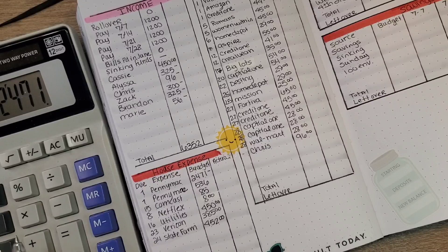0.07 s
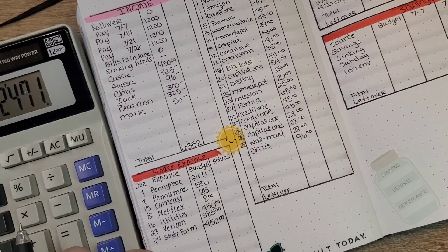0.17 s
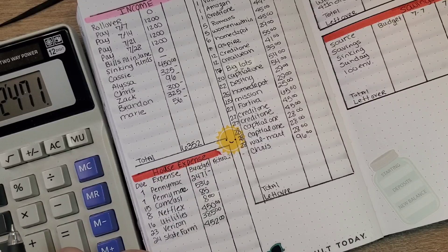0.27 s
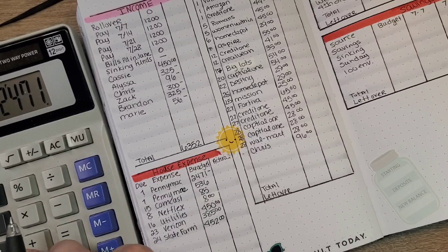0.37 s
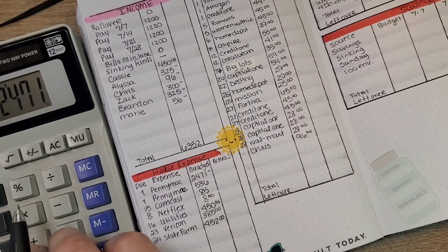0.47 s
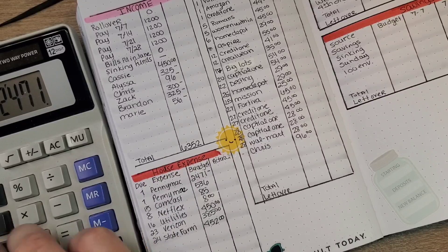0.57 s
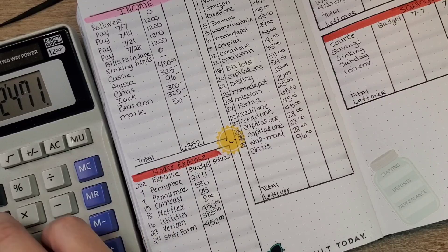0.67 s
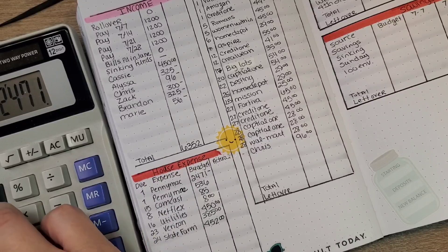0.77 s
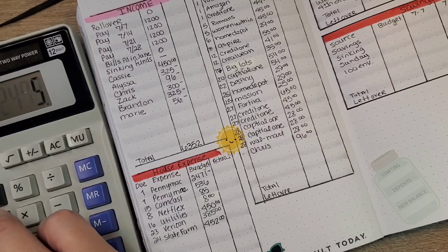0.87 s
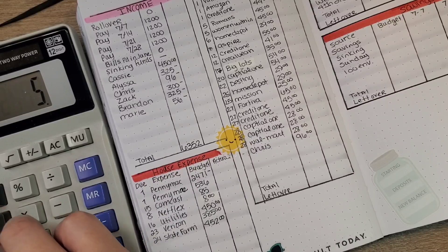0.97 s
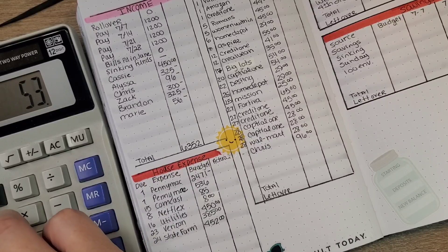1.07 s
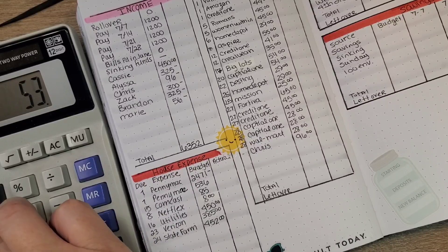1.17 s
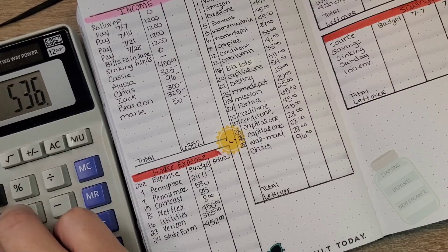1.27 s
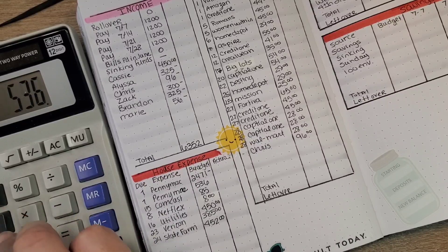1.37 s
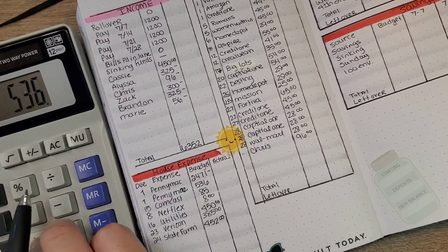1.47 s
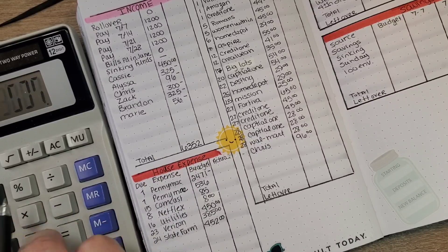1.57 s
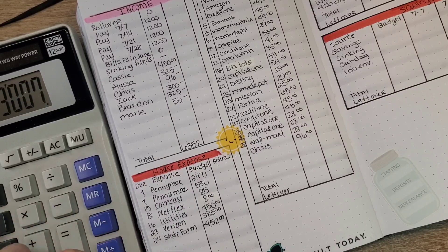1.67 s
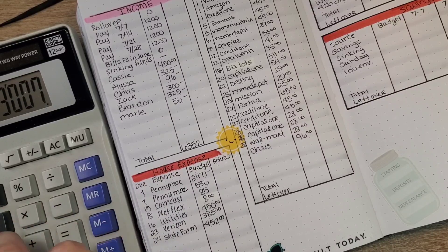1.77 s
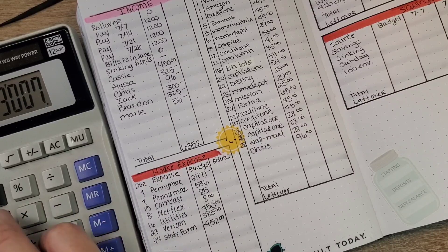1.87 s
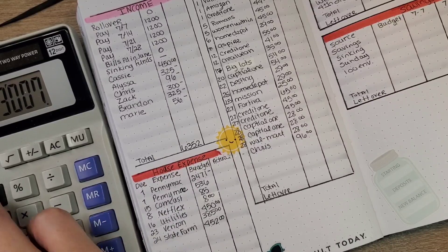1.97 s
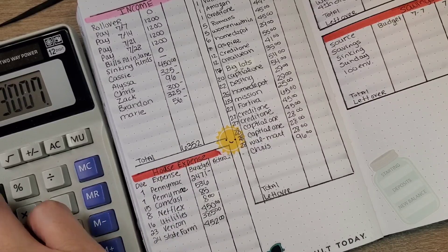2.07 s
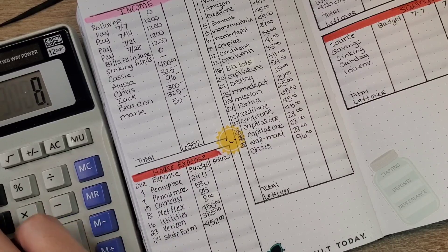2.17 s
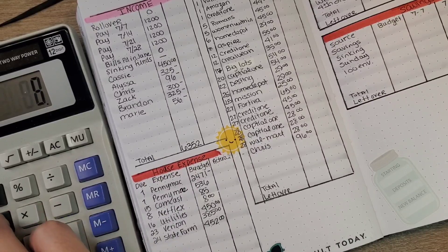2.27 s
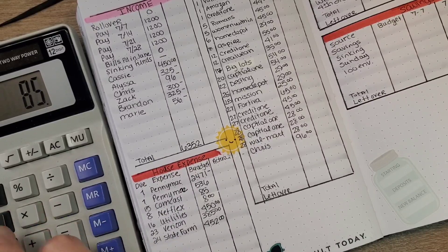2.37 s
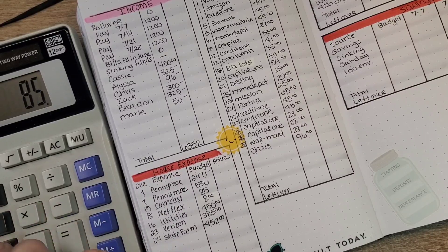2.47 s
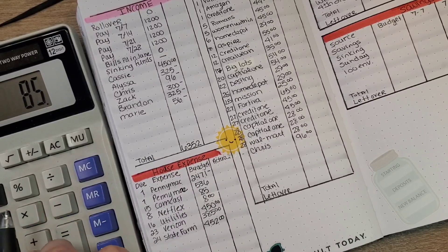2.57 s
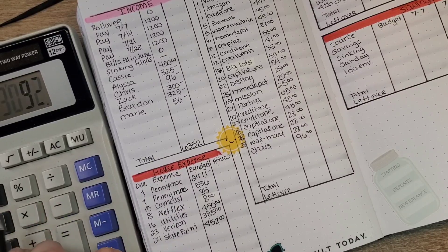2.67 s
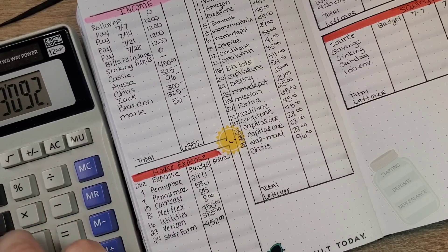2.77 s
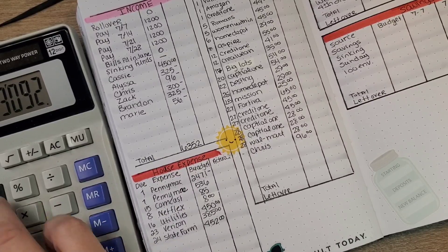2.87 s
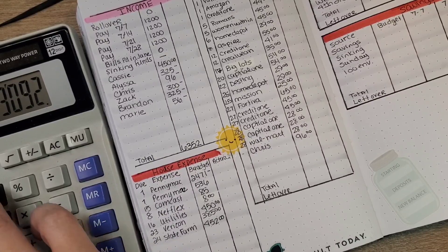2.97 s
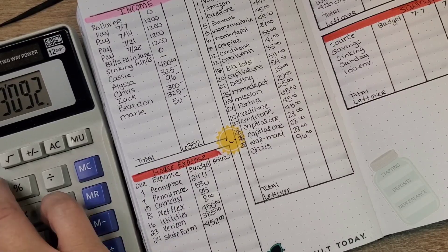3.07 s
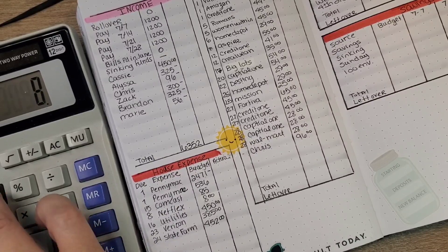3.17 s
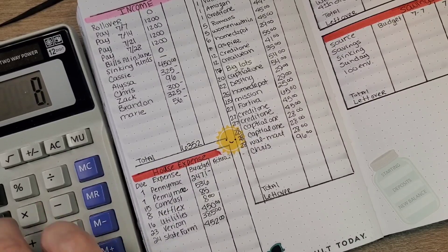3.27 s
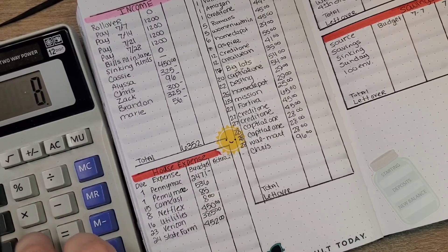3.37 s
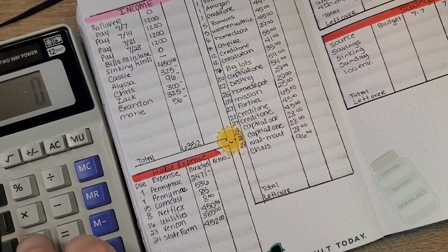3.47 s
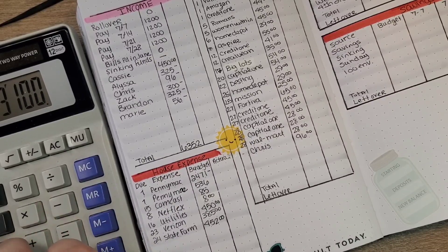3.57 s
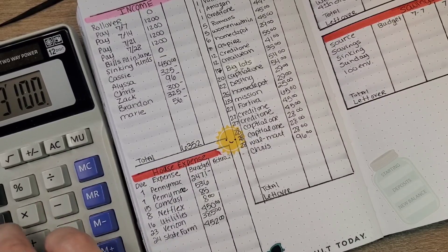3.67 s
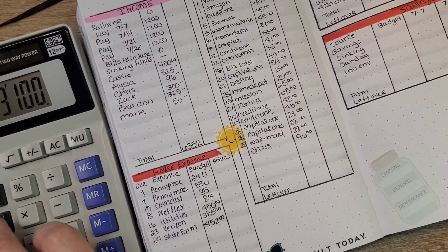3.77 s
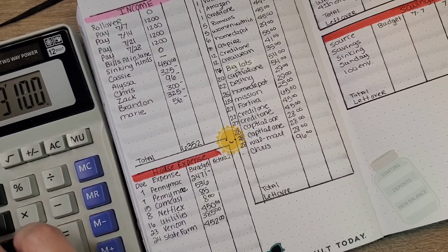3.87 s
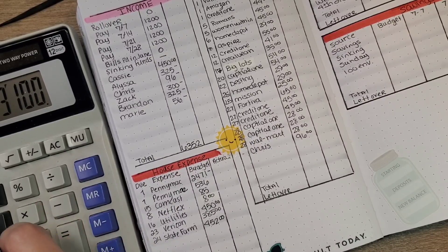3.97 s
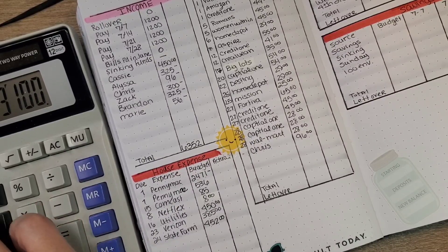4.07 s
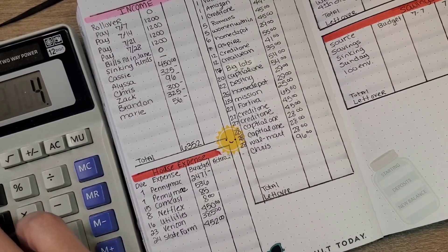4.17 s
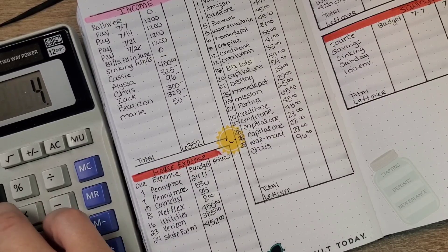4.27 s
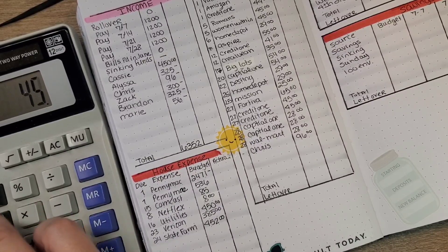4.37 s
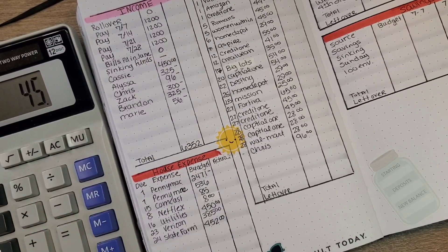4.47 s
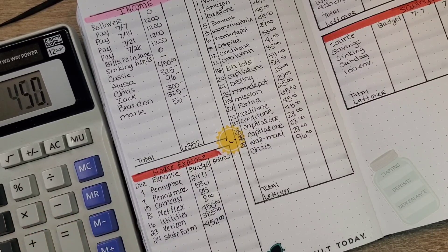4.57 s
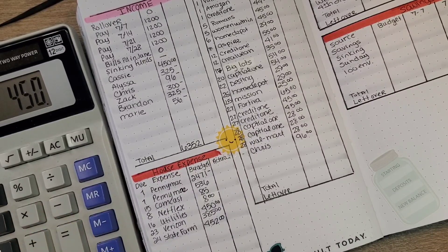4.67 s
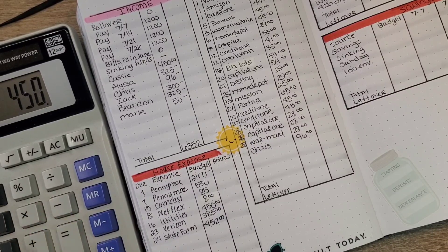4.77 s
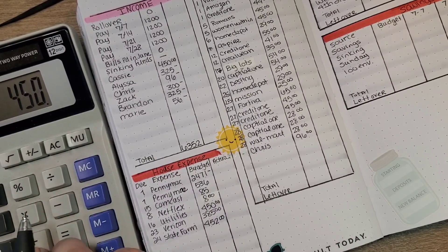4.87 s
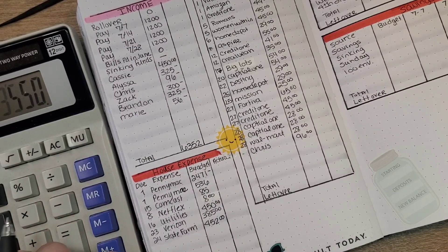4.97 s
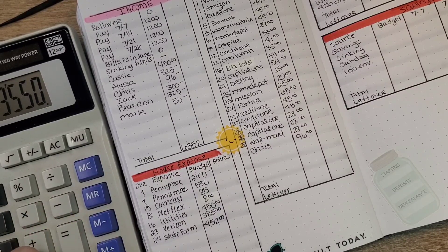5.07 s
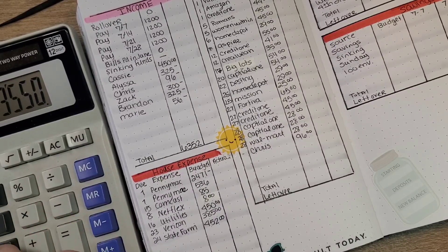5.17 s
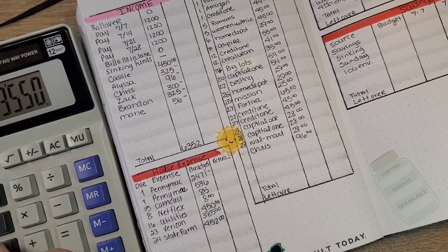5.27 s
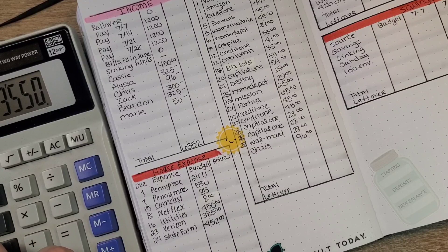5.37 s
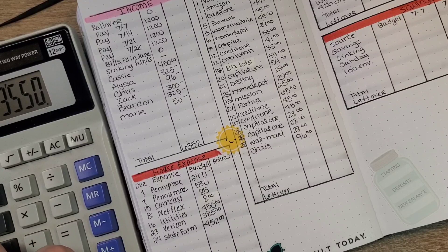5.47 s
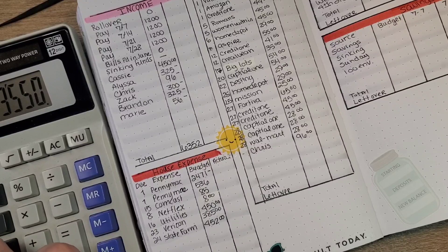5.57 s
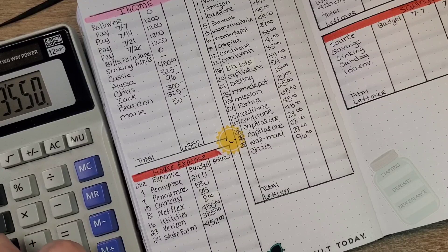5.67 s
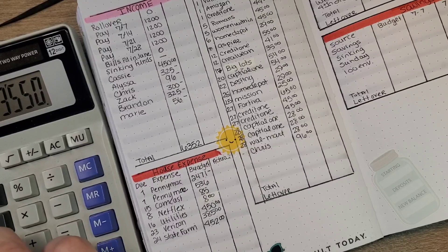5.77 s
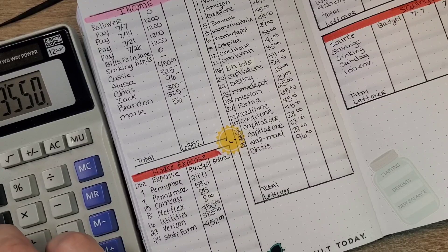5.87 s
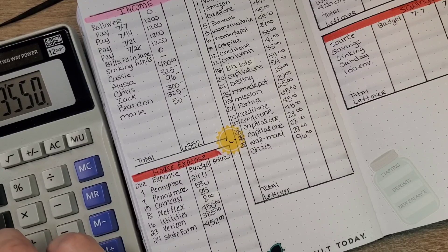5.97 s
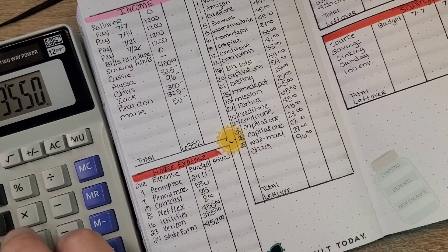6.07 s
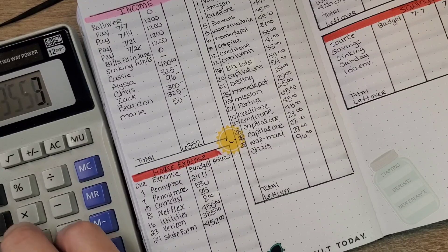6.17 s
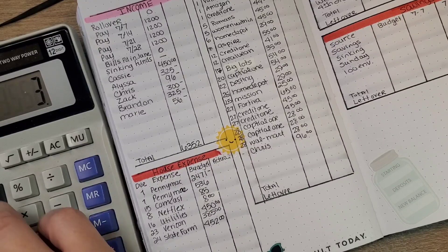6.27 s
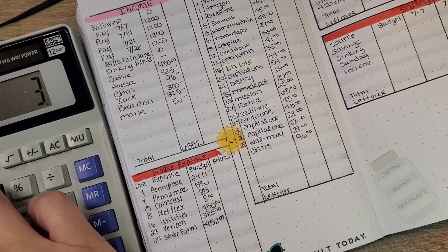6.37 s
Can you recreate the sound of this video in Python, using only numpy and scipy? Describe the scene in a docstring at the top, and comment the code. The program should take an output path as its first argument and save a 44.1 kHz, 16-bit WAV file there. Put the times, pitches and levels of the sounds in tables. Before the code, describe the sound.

Plastic calculator keys click in quick, irregular runs with soft desk thumps, over a low steady motor hum indoors.

```python
"""Throughout, a motor hums beyond a wall over the air noise of a room and microphone hiss.
From 0.5 to 5 s fingers press and release the plastic keys of a desk calculator, close and to the left
of two microphone ports. Each stroke is a short rattle that rings the hollow case; many thump the desk,
and a wall and the room throw the rattle back. After a pause, one last key goes down and up at 6.2 s."""
import sys
import numpy as np
from scipy import signal
from scipy.fft import rfft, irfft
from scipy.io import wavfile
from scipy.ndimage import uniform_filter1d

SR = 44100
rng = np.random.default_rng(int(sys.argv[2]) if len(sys.argv) > 2 else 0)


def dump(signal):
    """Clip the signal to [-1, 1] and save it as 16-bit WAV at the path in sys.argv[1]."""
    limited = np.clip(np.atleast_2d(signal).T, -1, 1)
    pcm = np.round(limited * 32767).astype(np.int16)
    wavfile.write(sys.argv[1], SR, pcm)


N = 282857
ONSET_SAMPLES, KNOCK_SAMPLES = 2048, 8192
KNOCK_MS = (np.arange(KNOCK_SAMPLES) - ONSET_SAMPLES) / SR * 1000


def amp(db):
    return 10 ** (np.asarray(db) / 20)


def unit_rms(x):
    return x / np.sqrt(np.mean(x ** 2) + 1e-20)


def curve_at(points, hz):
    """Interpolate (frequency, value) points over log frequency."""
    points_hz, values = np.transpose(points)
    return np.interp(np.log(hz + 1), np.log(points_hz + 1), values)


def add_knock(mix, time_s, sound):
    """Mix in a knock with its onset at time_s."""
    start = round(time_s * SR) - ONSET_SAMPLES
    span = mix[..., start:start + KNOCK_SAMPLES]
    span += sound[..., :span.shape[-1]]


def motor_hum():
    """Shaft orders of the motor and two unrelated low tones, each wavering in level."""
    # (shaft order, rms level [dB])
    orders = [(1, -53), (2, -42), (3, -52.5), (4, -66), (8, -69), (9, -72)]
    # low tones: (frequency [Hz], rms level [dB])
    drones = [(37., -77), (59.2, -58.5)]
    shaft_hz, waver_db = 28.36, 0.4
    waver_hz = np.geomspace(0.2, 1.4, num=12)
    t = np.arange(N) / SR
    hum = 0
    for hz, db in [(order * shaft_hz, db) for order, db in orders] + drones:
        waver = unit_rms(sum(np.sin(2 * np.pi * (f * t + rng.random())) / np.sqrt(f) for f in waver_hz))
        hum += np.sqrt(2) * amp(db + waver_db * waver) * np.sin(2 * np.pi * (hz * t + rng.random()))
    return hum


def air_noise(rms_db=-50.5, patch_db=1.55):
    """Room air: bass-heavy noise with faint patches drifting through its spectrum."""
    # (frequency [Hz], relative density [dB])
    spectrum = [(12, -47), (20, -31.5), (45, -7), (100, -24.5), (135, -19), (170, -27), (320, -27),
                (520, -32.5), (620, -31.5), (1000, -41), (1350, -40.5), (2300, -50.5), (3100, -49),
                (3600, -53.5), (7600, -60.5), (8200, -101)]
    # (frequency [Hz], left-right correlation)
    coherence = [(60, 0.9), (130, 0.74), (290, 0.44), (640, -0.33), (1410, -0.54), (3100, 0.12),
                 (6820, -0.21), (15000, 0.69)]
    frames, hz = N // 512 + 5, np.fft.rfftfreq(2048, 1 / SR)
    left_re, left_im, other_re, other_im, patches = rng.standard_normal((frames, 1025, 5)).T
    patches = uniform_filter1d(patches, size=20, axis=0)
    patches = unit_rms(uniform_filter1d(patches, size=8, axis=1))
    corr = curve_at(coherence, hz)[:, None]
    left = left_re + 1j * left_im
    right = corr * left + np.sqrt(1 - corr ** 2) * (other_re + 1j * other_im)
    spectra = np.array([left, right]) * amp(curve_at(spectrum, hz)[:, None] + patch_db * patches)
    return amp(rms_db) * unit_rms(signal.istft(spectra, nperseg=2048, noverlap=1536)[1][:, :N])


def ring(force, modes):
    """Drive damped modes of alternating sign: (frequency [Hz], width [Hz], level [dB])."""
    hz = np.fft.rfftfreq(KNOCK_SAMPLES, 1 / SR)
    mode_hz, width_hz, db = np.transpose(modes)[:, :, None]
    sign = (-1.) ** np.arange(len(modes))[:, None]
    damping = 1j * hz * width_hz
    response = sign * amp(db) * damping / (mode_hz ** 2 - hz ** 2 + damping)
    return irfft(rfft(force) * response.sum(0), KNOCK_SAMPLES)


def key_rattle(cap_db, case_hz, cap_hz, case_db, tick_db, fall_ms, snap_db, rise_ms=10.3):
    """The stem chatters in its guide: tiny knocks swell, jump by snap_db at the stop and die away."""
    # calculator modes: (frequency [Hz], width [Hz], level [dB])
    body = [(380, 39, -7), (680, 32, -8.5), (860, 61.5, -3), (1010, 107, -1.5), (1230, 233, -3),
            (1436, 63, -3), (1620, 55, 0.5), (1780, 110, -0.5), (1990, 173, 6), (2560, 143, 1),
            (3207, 374, -2.5), (3840, 390, -6), (4490, 230, -6.5), (4990, 230, 4), (5700, 394, 6),
            (6670, 920, 3), (7770, 810, 2.5), (11600, 4200, 9.5), (15400, 3700, 10)]
    # edges of the case, keycap, tick and sizzle bands [Hz]
    edges_hz = [0, 1400, 4800, 9000, SR]
    # per band: (hold [ms], share of rise_ms, share of fall_ms, left-right correlation, left excess [dB])
    bands = [(4.06, 0.76, 0.73, 0.88, 5), (2.3, 1, 0.86, 0.58, 3), (1.15, 0.84, 0.71, 0.15, 3),
             (1.3, 0.54, 0.77, 0.09, 3)]
    modes = np.array(body + [(case_hz, 60, 0), (cap_hz, 130, -2)], float)
    grain_db = 2.9 * np.minimum(rng.exponential(1, KNOCK_SAMPLES), 5)
    left, other = rng.standard_normal((2, KNOCK_SAMPLES))
    # each key's spot on the case favours modes near its own pitches
    nearness = np.exp(-(np.log(modes[:, :1] / [case_hz, cap_hz]) / 0.31) ** 2).sum(1)
    modes[:, 2] += 3.2 * nearness + 1.6 * rng.standard_normal(len(modes))
    # harder knocks are brighter
    tilt_db_per_octave, sizzle_db = 0.6 + 0.1 * tick_db, -7 + 1.45 * tick_db
    modes[:, 2] += tilt_db_per_octave * np.log2(modes[:, 0])
    rattle = 0
    for low_hz, high_hz, db, band in zip(edges_hz, edges_hz[1:], (case_db, 0, tick_db, sizzle_db), bands):
        hold_ms, rise_share, fall_share, corr, left_db = band
        rising = -KNOCK_MS / (rise_share * rise_ms)
        falling = np.maximum(KNOCK_MS - hold_ms, 0) / max(fall_share * fall_ms, 1)
        envelope = amp(-20 * np.maximum(rising, falling))
        envelope[KNOCK_MS < 0] *= amp(-max(snap_db, 0))
        right = corr * left + np.sqrt(1 - corr ** 2) * other
        chatter = envelope * amp(grain_db) * [left, right]
        # even in colour over all directions: the room gets one impulse of equal energy
        impulse = np.linalg.norm(chatter[0]) * (KNOCK_MS == 0)
        band_modes = modes[(modes[:, 0] >= low_hz) & (modes[:, 0] < high_hz)]
        ringing = np.vstack([ring(chatter, band_modes), ring(impulse, band_modes * [1, 2.2, 0.7])])
        peak_rms = np.sqrt(uniform_filter1d((ringing[:2] ** 2).mean(0), size=110).max())
        pan_db = np.array([[left_db / 2], [-left_db / 2], [0]])
        rattle += amp(db + pan_db) * ringing / peak_rms
    return amp(cap_db) * rattle


def key_strokes(rebound_s=0.017):
    """Keys hit their stops, snapping less if still rattling. Rows: left, right, room feed."""
    # (time [s], keycap level [dB], case pitch [Hz], keycap pitch [Hz],
    #  case re keycap [dB], tick re keycap [dB], nominal 20 dB fall [ms])
    strokes = [(0.4989,-41,1000,1710,-4,-23,-2),(0.5004,-33.5,1103,1730,4,-13.5,16.5),(0.573,-36.5,680,3400,-7,-9.5,34),(.5929,-29.5,680,2530,-0.5,-8.5,12),
               (.819,-49.5,1000,2460,9.5,-21,27),(0.8273,-38,1060,2500,1,-12,11),(.8587,-49.5,1060,1790,4.5,-23,14),(0.9001,-35,980,1990,-8.5,-1.5,9),(0.906,-35.5,940,1990,-5,-2.5,20),
               (1.036,-41,1170,2540,-3,-17,14),(1.0512,-36.5,1230,1770,-5.5,-20,7),(1.1201,-31.5,947,2560,-2.5,-5,20),
               (1.238,-43,1000,1890,-3,-22,7),(1.247,-38.5,1000,1950,3.5,-17,14),(1.3133,-46.5,1170,2170,5.5,-16,26),(1.334,-39.5,1000,2700,2.5,-1,11.5),
               (1.5497,-29.5,950,2570,1.5,-13.5,8.5),(1.558,-34,1040,1710,-0.5,-13.5,11),(1.6407,-37,690,2550,1,-10.5,3),(1.651,-27,703,2430,-5.5,-6,15),
               (2.1087,-40.5,1110,2230,-5,-12.5,18),(2.117,-40.5,980,2250,-15,-16,21),(2.125,-45,1050,1990,8.5,-9.5,-2),(2.189,-58,1000,2020,11,-11,4),(2.1975,-41,970,4000,-2,-6,6),(2.2076,-38,1090,2180,-0.5,-10.5,15.5),
               (2.3079,-45,1160,1620,-3,-5.5,20),(2.3145,-50,1170,1680,3.5,-14,10),(2.327,-34.5,933,2180,0,-15,11),(2.339,-48,1060,1850,4,-16,8),(2.3663,-53,1080,2150,4,-28,38),(2.4068,-39,930,2020,-1.5,-3.5,19),(2.4116,-47,1010,4170,3.5,-5,8),
               (2.636,-35.5,1000,1750,-0.5,-14.5,27),(2.6452,-36,1000,1910,10,-7.5,11),(2.723,-34.5,1090,2560,2,-5,8.5),(2.7346,-32,680,2770,-0.5,-3.5,21),
               (3.1228,-40.5,1015,2160,5,-16,5),(3.1408,-34,1044,1560,-1,-15,11.5),(3.184,-46.5,1030,1990,1,-26,6),(3.205,-48.5,1060,1990,8.5,-22,3),(3.2164,-35,1000,2090,-5.5,-1,10.5),
               (3.4622,-38,930,1640,8.5,-12.5,17),(3.542,-51,860,1960,-1,-12,13),(3.5652,-35,1350,2520,-3.5,-1.4,21.5),(3.5808,-36.5,680,2820,0,-12,6),
               (4.112,-42.5,1000,1640,9.5,-15,22),(4.1261,-31.5,1040,1605,2,-11,6.5),(4.1568,-45.5,975,1620,3,-13,2.5),(4.175,-61,990,1500,16.5,-15,18),(4.213,-29,1000,2570,-4,-5,19.5),
               (4.3109,-32.5,1025,1850,-0.5,-5.5,14.5),(4.332,-53,1090,3150,7.5,-5,9),(4.3846,-56.5,900,1640,9.5,-20,34),(4.4132,-32,1270,2000,-9.5,-4.5,12),(4.4252,-39,1000,2000,-3.5,2.5,16),
               (4.5672,-44.5,1010,1780,0.5,-16.5,12),(4.5826,-49.5,1100,1910,3,-18,24),(4.6129,-50,1280,1570,6,-22,26),(4.6234,-46.5,1030,1620,-1,-12,15),(4.649,-36,1230,3520,-20,-2,13.5),(4.657,-43.5,1110,2520,-0.5,-2,21),
               (4.9203,-38.5,930,1710,4.5,-13.5,23),(4.9364,-36,926,1710,3,-14,-1),(4.9416,-40,660,1770,2.5,-18,5),(5.0007,-61,920,2290,20,-17,10),(5.0235,-29.5,900,1990,-2.5,-6,24),
               (6.164,-42.5,990,1770,1,-29,24),(6.18,-37,1230,1550,-8.5,-10,13),(6.241,-39.5,1150,2700,-5,-14,9),(6.2483,-39,1030,2050,-2,-4.5,22)]
    clicks, previous_s = np.zeros((3, N)), 0
    for time_s, cap_db, case_hz, cap_hz, case_db, tick_db, fall_ms in strokes:
        snap_db = (6.5 if time_s - previous_s < rebound_s else 14.5) + 0.29 * tick_db
        add_knock(clicks, time_s, key_rattle(cap_db, case_hz, cap_hz, case_db, tick_db, fall_ms, snap_db))
        previous_s = time_s
    return clicks


def microphone_ports(left, right):
    """The farther right port hears the keys later; bass bends further round the housing."""
    # (frequency [Hz], right delay [samples])
    lag = [(500, 30.7), (1000, 15.15), (2000, 12), (4000, 12.97)]
    lag_samples = curve_at(lag, np.fft.rfftfreq(N, 1 / SR))
    delay = np.exp(-2j * np.pi * np.fft.rfftfreq(N) * lag_samples)
    return np.array([left, irfft(rfft(right) * delay, N)])


def room_tail(feed, build_s=0.0091, wall_s=0.049, wall_width_s=0.0077, wall_db=6.5):
    """Sparse reflections die band by band, with a clump where a far wall answers."""
    # (frequency [Hz], T60 [s], relative level [dB])
    decay = [(300, 0.24, 2), (1000, 0.24, -4.5), (2630, 0.35, -2.5), (4500, 0.42, -3), (8100, 0.33, 0.5),
             (13700, 0.4, -0.5)]
    size = SR // 2
    taps = np.zeros((2, size))
    arrivals = np.arange(300, size - 20, 20) + rng.integers(0, 20, (2, (size - 301) // 20))
    np.put_along_axis(taps, arrivals, rng.choice([-1., 1.], arrivals.shape), 1)
    hz, t, spectra = signal.stft(taps, SR, nperseg=256)
    t60_s, level_db = (curve_at(np.array(decay)[:, [0, k]], hz)[:, None] for k in (1, 2))
    wall = amp(wall_db * np.exp(-((t - wall_s) / wall_width_s) ** 2))
    envelope = np.minimum(t / build_s, 1) * wall * amp(level_db - 60 * t / t60_s)
    tail = signal.istft(spectra * envelope, SR, nperseg=256)[1]
    return signal.fftconvolve(feed, tail / np.linalg.norm(tail[0]), axes=1)[:, :N]


def room_echoes(feed, turn_hz=2.3):
    """Keys at different spots excite the room differently: three tails take turns."""
    phase = np.pi * turn_hz * np.arange(N) / SR
    return np.sqrt(2 / 3) * sum(room_tail(feed * np.cos(phase + k * np.pi / 3)) for k in range(3))


def desk_thumps(ms_per_20_db=14):
    """A finger's weight lands on or leaves a key and rings the desk through the feet; mono."""
    # desk top: (frequency [Hz], width [Hz], level [dB])
    modes = [(130.3, 11.7, -0.5), (222, 15, -1)]
    # (time [s], peak level [dB])
    pushes = [(0.5727,-55),(.5929,-47),(.8274,-38),(.905,-46),(1.0512,-40.5),(1.248,-39.5),(1.333,-52),(1.559,-38),(1.652,-44.5),(2.12,-45.5),(2.2072,-46.5),(2.326,-40.5),(2.4107,-48.5),(2.6457,-43),(3.1413,-40.5),(3.463,-45),(3.569,-45),(4.127,-39),(4.213,-56),(4.319,-41),(4.4244,-44),(4.5842,-46),(4.6244,-48.5),(4.9216,-43),(6.1643,-42.5),(6.2503,-48.5)]
    force = amp(-20 * abs(KNOCK_MS) / ms_per_20_db)
    thump = ring(force, modes)
    thumps = np.zeros(N)
    for time_s, db in pushes:
        add_knock(thumps, time_s, amp(db) * thump / abs(thump).max())
    return thumps


def scene(echo_db=-14):
    """Keys, echoes and thumps over hum and air."""
    clicks = key_strokes()
    direct = microphone_ports(clicks[0], clicks[1])
    echoes = amp(echo_db) * room_echoes(clicks[2:])
    return direct + echoes + desk_thumps() + motor_hum() + air_noise()


def record(dry, hiss_db=-78, cutoff_hz=15900):
    """Microphone self-noise rising to the treble, then a band limit."""
    hiss = amp(hiss_db) * unit_rms(np.diff(rng.standard_normal((2, N + 1)), axis=1))
    lowpass = signal.firwin(127, cutoff_hz, window=("kaiser", 8), fs=SR)
    return signal.oaconvolve(dry + hiss, lowpass[None], "same")


dry = scene()
out = record(dry)
dump(out)
```